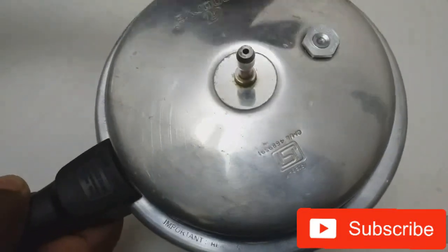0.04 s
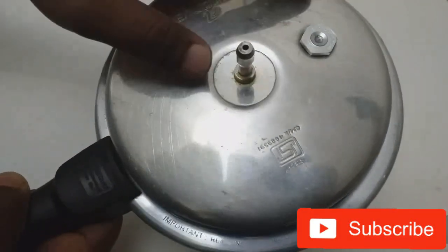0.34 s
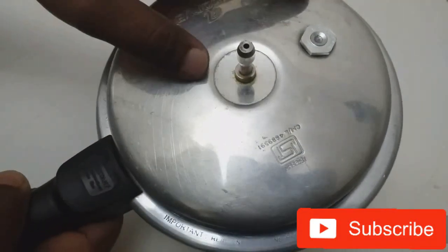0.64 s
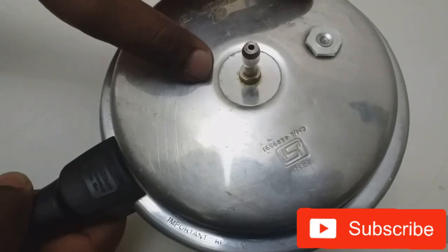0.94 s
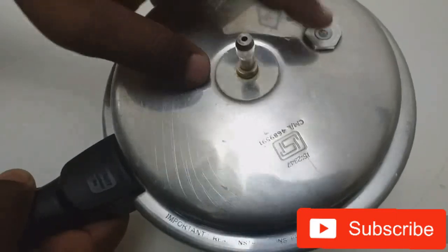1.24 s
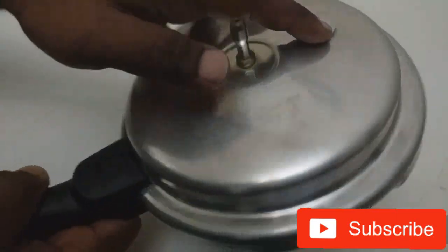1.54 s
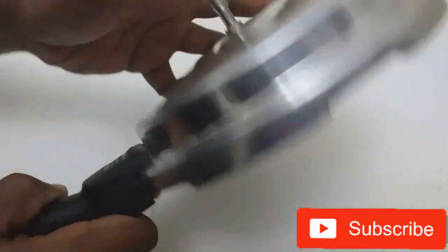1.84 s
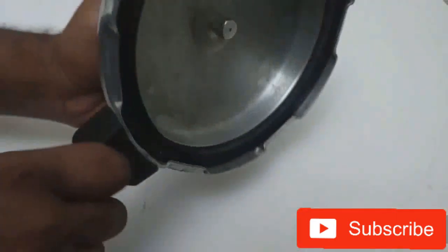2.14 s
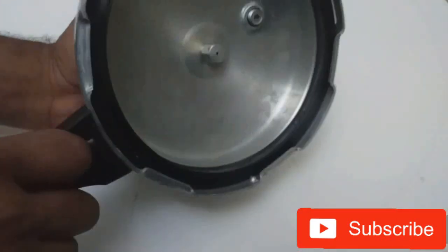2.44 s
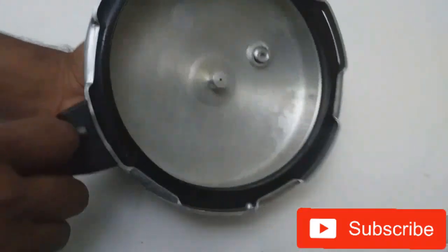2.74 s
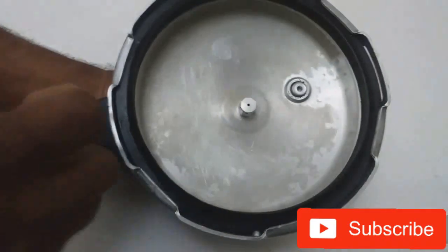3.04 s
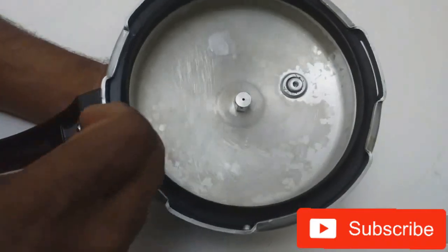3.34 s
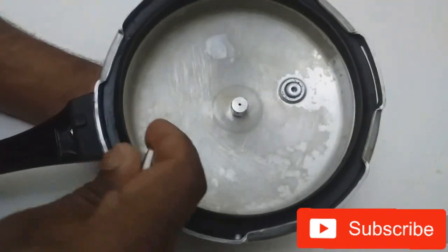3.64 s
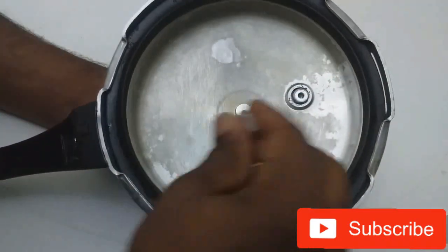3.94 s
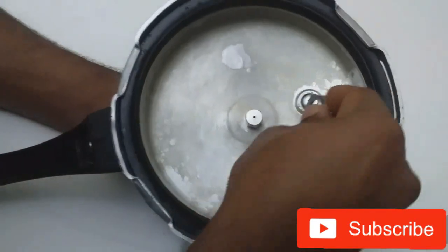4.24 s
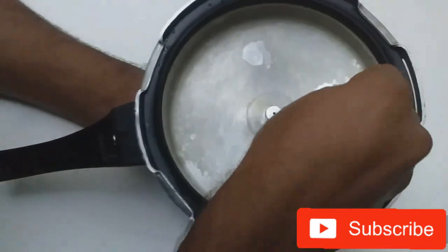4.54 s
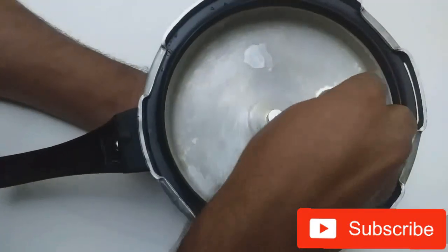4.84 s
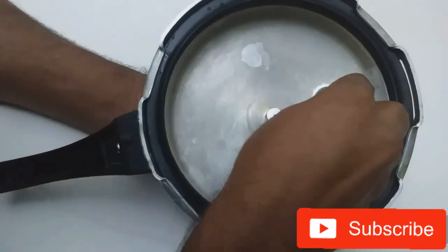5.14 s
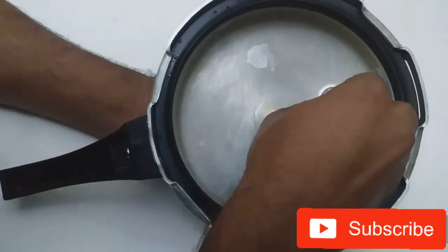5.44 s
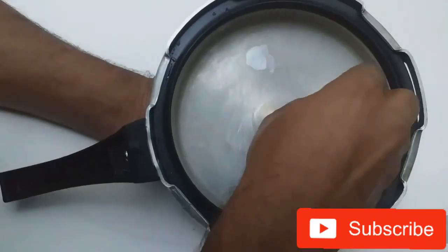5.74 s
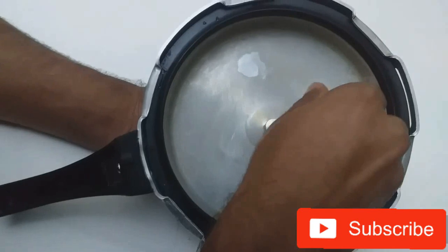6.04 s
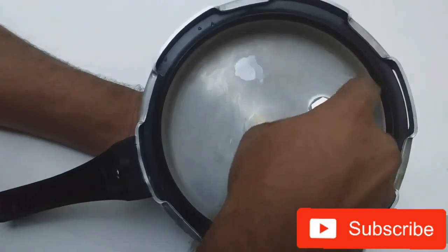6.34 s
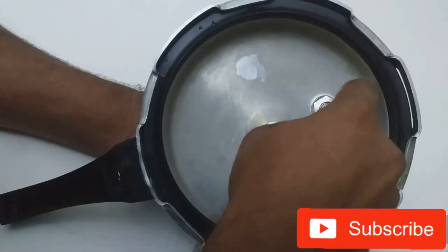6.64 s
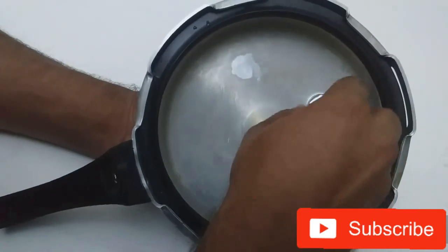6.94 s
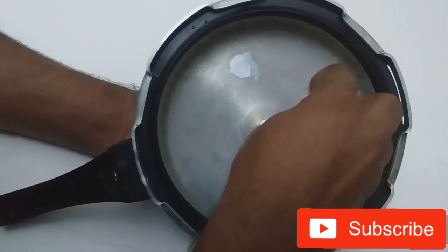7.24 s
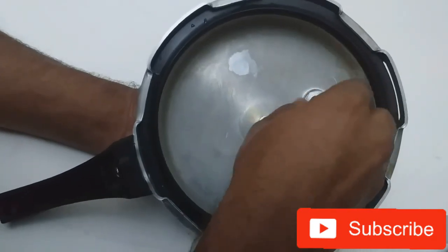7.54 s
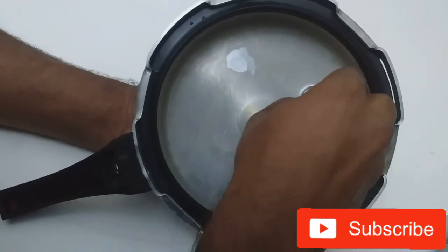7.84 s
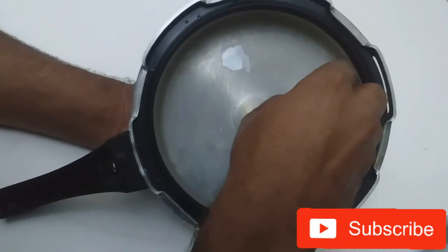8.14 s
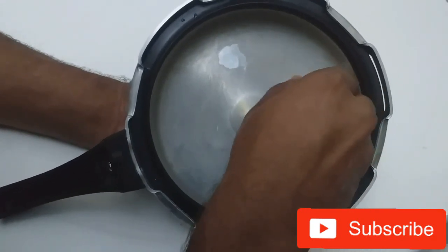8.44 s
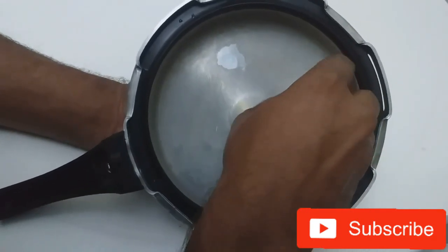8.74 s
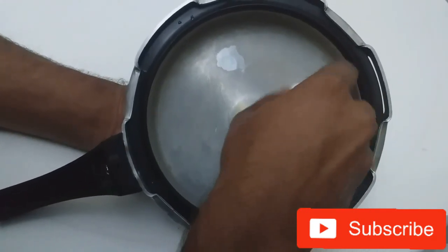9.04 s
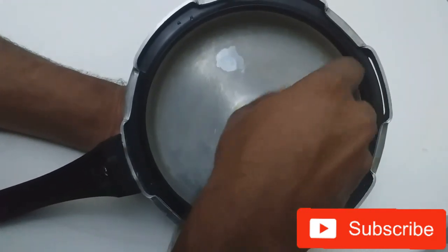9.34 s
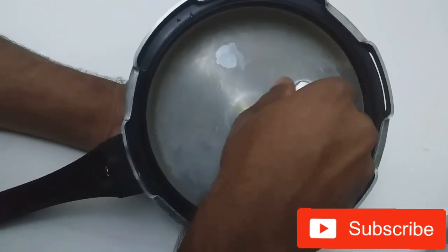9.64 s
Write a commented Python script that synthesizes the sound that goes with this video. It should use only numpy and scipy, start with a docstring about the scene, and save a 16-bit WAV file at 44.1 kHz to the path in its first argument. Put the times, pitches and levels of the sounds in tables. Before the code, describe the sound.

A low fan drone with a faint hum and hiss fills a small room, swelling slightly at about 1 second and continuing throughout. Close up, the valve pin of a metal pressure cooker lid gives two dry, high ticks at around 1.4 seconds. From 1.7 to 4 seconds the lid is turned over with light ticks, soft skin rubbing and faint handle creaks. At 4.5 seconds the valve clicks with a short ping, then again more softly. At 4.9 seconds it slips with a loud, bright clack that briefly rings the lid, the loudest sound. Small, irregular metal scrapes and ticks follow as the valve is unscrewed, growing busier after 7 seconds, with a sharper clink at 8.8. Dull knocks land at about 7.7, 9 and 9.3 seconds, and the strongest comes at 9.7.

```python
"""A pressure cooker lid is turned over by hand in a small room, and its safety valve is unscrewed.
Metal ticks and scrapes on metal and sets the lid ringing, once with a loud slip; a few dull knocks follow.
The valve's pin clicks and its loose body pings. Skin rubs over the lid and the handle sticks and creaks.
Underneath, a fan drones in the room's low resonances, with a faint hum and hiss."""
import sys
import numpy as np
from scipy import signal
from scipy.fft import rfft, irfft
from scipy.io import wavfile

SR = 44100
rng = np.random.default_rng(int(sys.argv[2]) if len(sys.argv) > 2 else 0)


def transcribe(u):
    """Save the signal u as a 16-bit wav file named by the first command-line argument.

    u: samples, shape (n,) or (channels, n), limited to [-1, 1]; the rate is SR.
    q: integer samples, one column per channel.
    """
    v = np.clip(np.atleast_2d(u).T, -1, 1)
    q = np.round(v * 32767).astype(np.int16)
    wavfile.write(sys.argv[1], SR, q)


N = 427764
TIME = np.arange(N) / SR
BODY_HZ, EDGE_HZ = 2200, 8400   # a contact's "body" lies below the first, its "edge" above the second


def from_db(db):
    """Decibels to gain."""
    return 10 ** (np.asarray(db) / 20)


def at_hz(points, hz):
    """Read a table on a log-frequency axis."""
    f, value = np.transpose(points)
    return np.interp(np.log(np.maximum(hz, 1)), np.log(f), value)


def add(track, s, sound):
    """Mix a sound in at time s."""
    start = round(s * SR)
    track[start:start + len(sound)] += sound[:N - start]


def butter(x, order, hz, kind):
    """Butterworth low-, high- or band-pass."""
    return signal.sosfilt(signal.butter(order, hz, kind, fs=SR, output="sos"), x)


def shelved(x, hz, gain_db):
    """Raise or lower everything above hz."""
    low, high = (butter(butter(x, 4, hz, kind), 4, hz, kind) for kind in ("low", "high"))
    return low + from_db(gain_db) * high


def coloured(x, spectrum, size=2048):
    """Minimum-phase EQ that leaves white noise its power."""
    gain = from_db(at_hz(spectrum, np.fft.rfftfreq(size, 1 / SR)))
    cepstrum = irfft(np.log(gain))
    cepstrum[1:size // 2] *= 2
    cepstrum[size // 2 + 1:] = 0
    response = irfft(np.exp(rfft(cepstrum)))
    return signal.oaconvolve(x, response / np.linalg.norm(response))[:len(x)]


def ring(force, modes):
    """A click sets each mode ringing as a dying sine."""
    out = 0
    for hz, db, t60 in modes:
        r, w = from_db(-60 / (t60 * SR)), 2 * np.pi * hz / SR
        out += from_db(db) * signal.lfilter([0, np.sin(w)], [1, -2 * r * np.cos(w), r * r], force + 1e-18)
    return out


def resonate(x, peaks):
    """Parallel resonances that leave white noise about its power."""
    out, power = 0, 0
    for hz, width, db in peaks:
        r, w = np.exp(-np.pi * width / SR), 2 * np.pi * hz / SR
        band = signal.lfilter([1, 0, -1], [1, -2 * r * np.cos(w), r * r], x + 1e-18)
        out += from_db(db) * (1 - r * r) / 2 * band
        power += from_db(db) ** 2 * (1 - r)
    return out / np.sqrt(power)


def rms_one(x):
    """Scale to rms 1."""
    return x / np.sqrt(np.mean(x ** 2) + 1e-20)


def voiced(force, body_db, edge_db, edge_hz):
    """A firm contact drives the low body modes; a sharp one drives the top."""
    return from_db(body_db) * shelved(shelved(force, BODY_HZ, -body_db), edge_hz, edge_db)


def chatter(rise_s, size=2048):
    """Tiny bounces that swell and die within milliseconds and shake all pitches about evenly; energy 1."""
    age = TIME[:size] / rise_s
    spectrum = rfft(rng.standard_normal(size) * age * np.exp(-age))
    flattened = irfft(spectrum / np.abs(spectrum) ** .75)
    burst = flattened * np.exp(-(age / 8) ** 2)
    return burst / np.linalg.norm(burst)


def touches(rows):
    """Force of metal tapping metal, one chatter per row of t/s, level/dB, body/dB, edge/dB."""
    force = np.zeros(N)
    for s, db, body_db, edge_db in rows:
        burst = chatter(rise_s=.0018) * np.sqrt(.007 * SR)
        add(force, s, from_db(db) * voiced(burst, body_db, edge_db, EDGE_HZ))
    return force


def strokes(rows, edge_hz, slips_per_s, slip_db, spot_share, stretch=1.625, size=48):
    """Sliding force: grit that swells quickly, fades slowly, and sticks and slips on the way."""
    force = np.zeros(N)
    for s, length, db, body_db, edge_db in rows:
        grip, grain, texture = rng.standard_normal((3, SR // 2))
        t = TIME[:int(np.clip(length * stretch * SR, size, SR // 2))]
        swell = np.sin(np.pi * (t / t[-1]) ** .62)
        slips = from_db(slip_db * np.interp(t * slips_per_s, np.arange(SR // 2), np.clip(grip, -1.5, 1.5)))
        rub = swell * slips * grain[:len(t)] ** 3
        # every spot of contact colours the stroke in its own way
        spot = signal.unit_impulse(size) + spot_share * texture[:size] / np.sqrt(size)
        stroke = rms_one(np.convolve(rub, spot))
        add(force, s, from_db(db) * voiced(stroke, body_db, edge_db, edge_hz))
    return force


# the room's boom under the fan: f/Hz, width/Hz, relative level/dB
ROOM_BOOMS = [(44.3, 1, -8), (61.5, 13, -1), (79.2, 5.3, 3), (92, 3.3, -0.5), (106, 16, -4),
              (116.8, 6, -0.5), (149.4, 20, -11.5), (169, 11, -1), (218.8, 11, 0.5), (231.1, 14, 2.5),
              (253, 21, -7.5), (278.5, 8.5, -10), (294.4, 11.6, -0.5), (334.3, 4.7, -6.5), (392.4, 26, -12)]
# EQ of the fan's air: f/Hz, relative level/dB
AIR_EQ = [(20, -31), (35, -31), (55, -5.5), (120, -1), (280, -1), (360, -13), (460, -8.5), (520, -15.5),
          (700, -19.5), (1000, -28), (2000, -39.5), (8000, -75.5)]
def fan():
    """Moving air, gathered into the room's low resonances."""
    booms = sum(from_db(db) * np.sqrt(width) * resonate(rng.standard_normal(N), [(hz, width, 0)])
                for hz, width, db in ROOM_BOOMS)
    booms = rms_one(butter(booms, 4, [42, 490], "band"))
    air = coloured(rng.standard_normal(N), AIR_EQ, size=16384)
    return from_db(-1) * booms + from_db(-7) * air


# the fan motor's tones: f/Hz, level/dB
MOTOR_TONES = [(462, -61), (2708, -73.5), (3973, -77.5)]
def hum(waver_db=2, waver_per_s=5):
    """The fan's motor adds a few faint tones that waver in level."""
    out = 0
    for hz, db in MOTOR_TONES:
        waver = np.interp(TIME * waver_per_s, np.arange(SR), rng.standard_normal(SR))
        out += from_db(db + waver_db * waver) * np.sin(2 * np.pi * hz * TIME)
    return out


# fader ride of the drone, which dips after the loud slip and creeps back: t/s, level/dB
DRONE_RIDE = [(0, -49), (.62, -50.5), (1.1, -42.5), (5.1, -44.5), (5.25, -46.5), (6.95, -42), (9.7, -43.5)]
# EQ of the room's faint hiss: f/Hz, relative level/dB
HISS_EQ = [(590, -33), (1000, -7), (1290, -7), (1670, -6.5), (1830, -2), (2410, -8), (2800, -1),
           (3030, -1.5), (3950, -1.5), (6170, -8), (6760, -2), (9420, -24.5), (15400, -12)]
def background(hiss_db_per_db=1.23):
    """Room tone: drone, hum and hiss rise and fall together, the hiss a little further."""
    gain = from_db(np.interp(TIME, *np.transpose(DRONE_RIDE)))
    swing = gain / np.median(gain)
    hiss = from_db(-63) * coloured(rng.standard_normal(N), HISS_EQ)
    return gain * fan() + swing * hum() + swing ** hiss_db_per_db * hiss


# reverb time of the small room: f/Hz, t60/s
ROOM_DECAY = [(300, 0.26), (1000, .45), (3000, 0.49), (7000, 0.37), (14000, 0.3)]
def room(x, predelay_s=.0034, size=32768):
    """Diffuse echoes off bare walls, longest in the upper mids and shorter at both ends."""
    t, hz = TIME[:size], np.fft.rfftfreq(size, 1 / SR)
    noise, tail = rfft(rng.standard_normal(size)), 0
    crossovers_hz = [1, 500, 1500, 4000, 8000, 22050]
    for low, high in zip(crossovers_hz, crossovers_hz[1:]):
        band = irfft(noise * (hz >= low) * (hz < high))
        tail += band * from_db(-60 * t / at_hz(ROOM_DECAY, (low + high) / 2))
    tail *= np.clip(t / predelay_s - 1, 0, 1)
    return signal.oaconvolve(x, tail / np.linalg.norm(tail))[:N]


# finger slides over the lid: centre t/s, length/s, level/dB
FINGER_SLIDES = [(0.052, .12, -68), (1.66, 0.37, -61.5), (2.115, 0.46, -58.5), (2.38, 0.19, -56),
                 (2.857, 0.1, -60.5), (3.36, .12, -62.5), (4.156, 0.72, -59), (4.703, 0.98, -65.5),
                 (6.81, 0.11, -62), (7.72, .3, -68.5), (8.55, 0.61, -66)]
# EQ of skin on metal: f/Hz, relative level/dB
SKIN_EQ = [(300, -1.5), (700, -8.5), (1400, -5), (2300, -1.5), (2900, 2.5), (4200, 1), (5500, 1),
           (7300, -2), (8300, -16.5), (9400, -20), (12000, -13.5), (15300, -9.5)]
def skin(spread_db=2):
    """Fingers hiss over the metal and faintly wake its modes; each slide speeds up, then slows."""
    speed = np.zeros(N)
    for s, length, db in FINGER_SLIDES:
        speed += from_db(db) * np.cos(np.pi * np.clip((TIME - s) / length, -.5, .5))
    # rough surfaces meet in countless tiny impacts of uneven size
    grit = rng.standard_normal(N) * from_db(spread_db * np.clip(rng.standard_normal(N), -2, 2))
    force = speed * shelved(rms_one(grit), EDGE_HZ, gain_db=5)
    return coloured(force, SKIN_EQ) + from_db(-49) * ring(force, HELD_LID_MODES)


# creaks as the grip shifts: t/s, length before stretch/s, level/dB, body/dB
CREAK_CUES = [(1.697, 0.028, -59.5, 5), (2.03, 0.3, -65.5, 0), (2.315, 0.075, -56, -2.5),
              (2.792, 0.069, -60.5, -5.5), (3.313, .07, -61, 4), (3.595, 0.023, -63.5, -10)]
# the handle's resonances: f/Hz, width/Hz, relative level/dB
HANDLE_PEAKS = [(1290, 80, 0), (1790, 50, -7), (2870, 250, -7), (4030, 150, -5), (5950, 140, -4),
                (10000, 150, -20), (14480, 150, -19)]
def creaks(edge_db=2):
    """The handle sticks and slips against the lid."""
    grips = [(*creak, edge_db) for creak in CREAK_CUES]
    force = strokes(grips, edge_hz=5000, slips_per_s=180, slip_db=6, spot_share=.45)
    return resonate(force, HANDLE_PEAKS)


# dull knocks: t/s, level/dB, treble/dB (flat at neutral_treble_db)
KNOCK_CUES = [(7.722, -22, -14), (8.582, -35.5, -15), (9.026, -21.5, -13.5), (9.281, -25, -8.5),
              (9.652, -11.5, -5)]
# the lid with its handle, knocked: f/Hz, level/dB, t60/s
THUD_MODES = [(468, -15, 0.048), (690, -0.5, 0.0091), (1402, -7, 0.013), (1720, -14, 0.017),
              (2080, -14, 0.0095), (4070, -19, 0.017), (5580, -22, 0.033), (7400, -57, 0.024)]
def knocks(neutral_treble_db=-10):
    """Each knock is one push into heavily damped modes; softer ones tend to be duller."""
    force = np.zeros(N)
    for s, db, treble_db in KNOCK_CUES:
        push = shelved(signal.unit_impulse(512), 2330, treble_db - neutral_treble_db)
        add(force, s, from_db(db) * push)
    return butter(ring(force, THUD_MODES), 2, 170, "high")   # a small lid radiates no deep bass


# a finger presses and frees the valve's pin: t/s, level/dB
PIN_CUES = [(1.369, -42), (1.403, -36)]
# the pin in its housing: f/Hz, level/dB, t60/s
VALVE_PIN_MODES = [(3100, -4, .012), (3600, 1, .018), (4350, 3, .02), (4800, -4, .012), (5700, -2, .018),
                   (6500, -1, .02), (7250, 2, .02), (11200, -22, .03)]
def pin():
    """The small pin rattles against its stop: a dry, high tick with no body."""
    force = np.zeros(N)
    for s, db in PIN_CUES:
        add(force, s, from_db(db) * chatter(rise_s=.001))
    return butter(ring(force, VALVE_PIN_MODES), 6, [2900, 7800], "band")


# pings of the loose valve body: t/s, level/dB
PING_CUES = [(4.503, -29.5), (4.762, -36.5), (7.803, -48), (8.751, -38.5), (8.832, -40), (9.07, -43)]
def pings(hz=2814, t60_s=.05):
    """The valve body rings with one short note of its own."""
    force = np.zeros(N)
    for s, db in PING_CUES:
        force[round(s * SR)] += from_db(db)
    return ring(force, [(hz, 0, t60_s)])


# turns of the valve: t/s, length before stretch/s, level/dB, body/dB
SCRAPE_CUES = [(4.933, 0.025, -25, -17), (5.264, 0.019, -45.5, 6.5), (5.747, 0.025, -45, 6.5),
               (5.849, 0.28, -61.5, -0.5), (6.448, 0.027, -50, 5), (6.747, 0.063, -52.5, -1),
               (7.068, 0.027, -54.5, 5), (7.206, 0.054, -38.5, 0.5), (7.615, 0.085, -48.5, 0.5),
               (8.131, 0.026, -49.5, 5), (8.297, 0.12, -58, -7), (8.507, 0.047, -49, -1),
               (8.641, 0.11, -52, 2.5), (8.851, 0.073, -43, -4.5), (9.205, 0.038, -41, -4),
               (9.239, 0.053, -51, 2), (9.534, 0.02, -47, 6.5), (9.562, 0.028, -41.5, -3),
               (9.614, 0.043, -40, -9)]
def scrapes(edge_db=-3.5, edge_per_body=.68):
    """Force of the valve grinding in its seat; the firmer the contact, the duller its top."""
    turns = [(s, length, db, body_db, edge_db - edge_per_body * body_db)
             for s, length, db, body_db in SCRAPE_CUES]
    return strokes(turns, EDGE_HZ, slips_per_s=490, slip_db=3.5, spot_share=.54)


# metal ticks on the lid: t/s, level/dB, body/dB
TICK_CUES = [(1.705, -47.5, 7.5), (1.979, -39.5, -7), (2.043, -48.5, 4), (2.122, -54, 5), (2.168, -61, 8),
             (4.441, -51, -1), (4.5028, -26, 0), (4.761, -36.5, 1.5), (6.089, -44, -4), (6.971, -46, -16),
             (7.585, -41.5, -6), (7.803, -51.5, 16), (7.835, -48.5, 9.5), (8.037, -49, -16),
             (8.682, -36.5, -5), (8.748, -46.5, 6), (8.83, -26, -7)]
def ticks(edge_db=-6):
    """Force of single light touches, all about equally sharp."""
    return touches([(*tick, edge_db) for tick in TICK_CUES])


def slip(s=4.9175, gap_s=.0043, db=-15.5, rise_db=4, fall_db=12.5, body_db=-5):
    """Force of the valve slipping: quick contacts build to a hard, bright hit, die away and rebound."""
    build_edge_db, hit_edge_db = -2, 11.5
    build = [(s - k * gap_s, db - k * rise_db, body_db, build_edge_db) for k in range(1, 5)]
    hit = [(s + k * gap_s, db - k * fall_db, body_db, hit_edge_db) for k in range(3)]
    rebound = [(s + .0315, -34, body_db, hit_edge_db)]
    # zing: these hard contacts reach the very top of the lid's modes
    return shelved(touches(build + hit + rebound), hz=12600, gain_db=4)


# EQ of the lid's clack: f/Hz, relative level/dB
CLACK_EQ = [(500, -54.5), (1000, -5.5), (1400, -6.5), (2100, -9.5), (2800, 7.5), (4200, 0.5), (4900, 1.5),
            (6300, 4.5), (7400, 4.5), (8100, -23.5), (10000, -14.5), (15500, -24.5)]
# the lid's ring, damped by the hand that holds it: f/Hz, relative level/dB, t60/s
HELD_LID_MODES = [(1280, -8, .09), (1446, -2, .1), (1777, -0.5, 0.19), (1795, 4, .05), (2360, -1, 0.054),
                  (2750, 0.5, 0.1), (2955, 4.5, 0.036), (3387, 2, 0.14), (4080, -12, 0.062),
                  (4367, 10, 0.033), (4780, -3.5, .05), (5470, -5.5, .1), (5530, -0.5, 0.095),
                  (5640, 1.5, 0.039), (6170, 4.5, 0.021), (6520, 3.5, .06), (6900, -12.5, 0.083),
                  (7040, -8.5, 0.15), (7280, -0.5, 0.061), (10330, -16.5, .1), (11000, -3, 0.016),
                  (13500, 2, 0.015), (14710, -9.5, .04), (15250, -2.5, .016)]
def lid(force):
    """Dense, quickly damped modes give the clack; a few lasting ones give the clink."""
    clack = from_db(-3.5) * coloured(force, CLACK_EQ)
    clink = from_db(-41) * ring(force, HELD_LID_MODES)
    return butter(clack + clink, 3, 1080, "high")   # little radiates below the lowest mode


def scene():
    """The handled lid up close, its echoes and the fan, in mono."""
    metal = pin() + pings() + lid(slip() + ticks() + scrapes())
    handle = creaks()
    thuds = knocks()
    reverb = room(from_db(-8.5) * (metal + handle) + from_db(-5.5) * thuds)
    return (metal + handle + thuds + reverb + skin() + background())[None]


def record(dry):
    """A steep high cut at 15550 Hz."""
    return signal.sosfilt(signal.ellip(14, .2, 100, 15550, fs=SR, output="sos"), dry)


dry = scene()
out = record(dry)
transcribe(out)
```